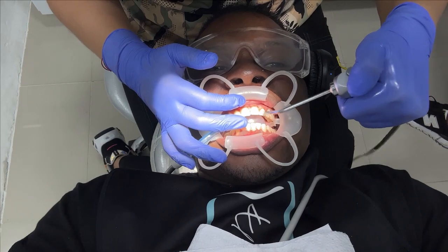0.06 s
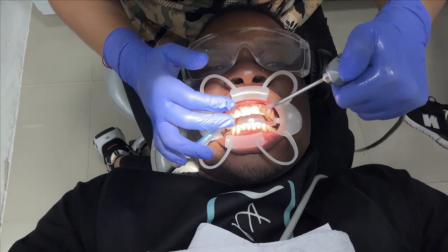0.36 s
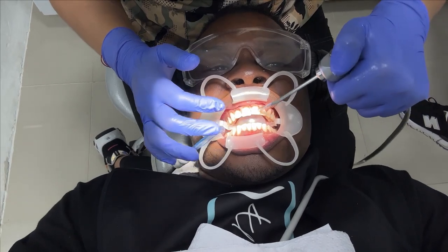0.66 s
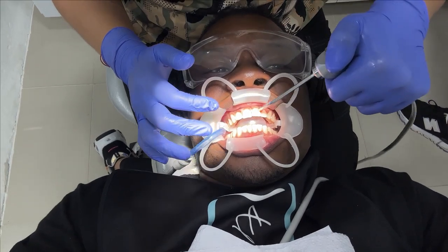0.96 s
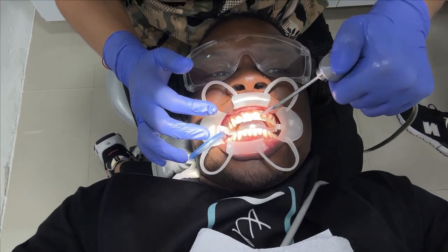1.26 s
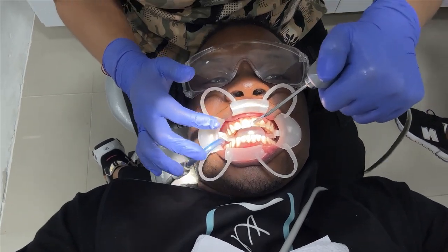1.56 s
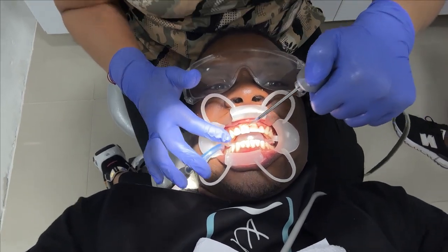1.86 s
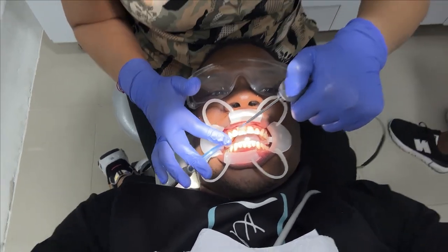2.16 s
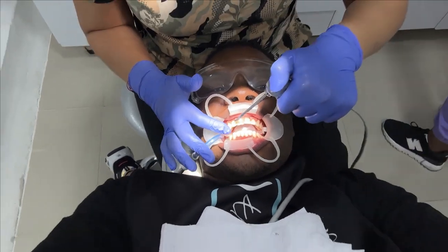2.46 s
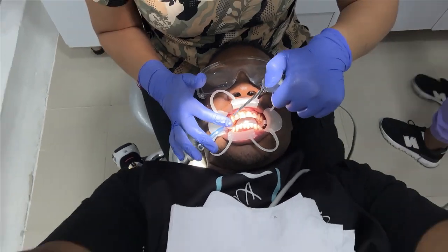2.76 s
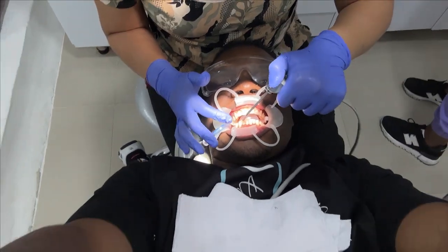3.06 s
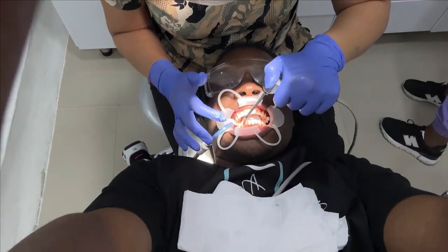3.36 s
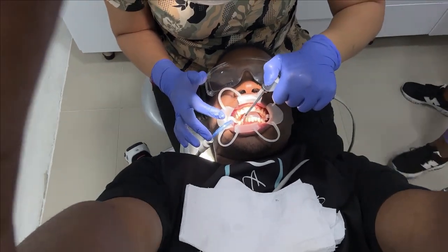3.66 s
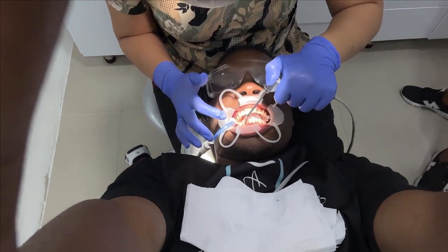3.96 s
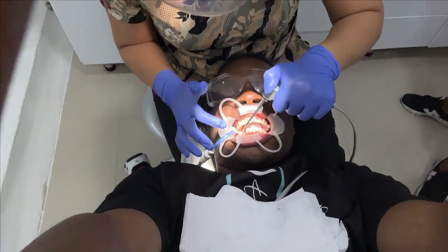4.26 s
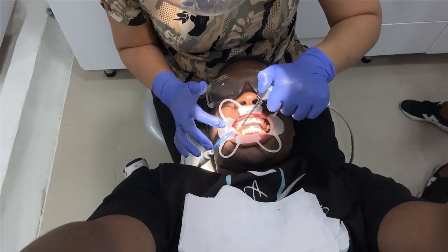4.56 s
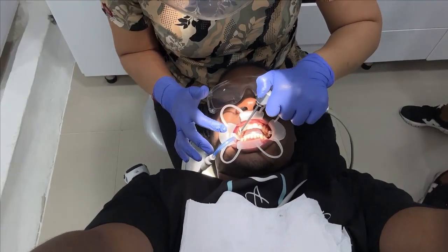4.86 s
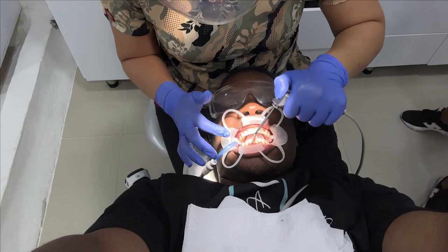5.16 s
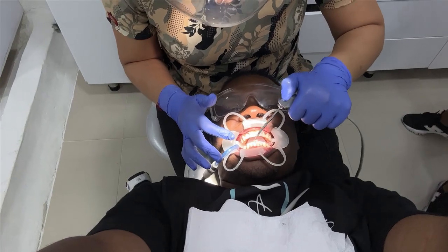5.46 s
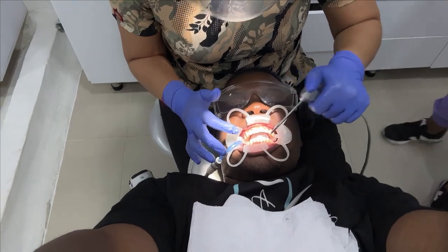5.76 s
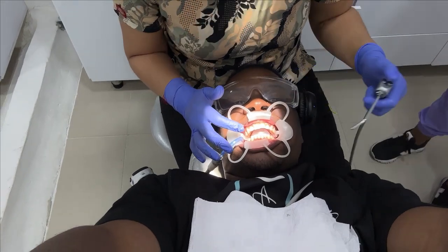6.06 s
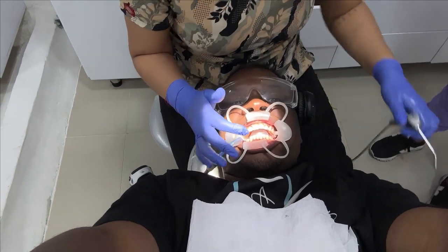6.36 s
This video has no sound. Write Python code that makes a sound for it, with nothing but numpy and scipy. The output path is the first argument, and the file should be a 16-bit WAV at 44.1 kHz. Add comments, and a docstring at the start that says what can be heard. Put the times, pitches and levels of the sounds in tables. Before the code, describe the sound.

A close jet of air and water sweeps over teeth, hissing and splashing in uneven surges while the open mouth gurgles and the tooth edges squeal and spit. The hand-held microphone bumps and rumbles softly partway through. After about five and a half seconds the jet stops, and a suction tube crackles with saliva among small wet pops and a last short sip, over the low ventilation of a dental room.

```python
"""Over the ventilation of a small clinic and a faint suction tube, an air and water nozzle sweeps teeth.
The jet hisses and splashes, rouses the hollow of the mouth, and squeals and spits on tooth edges.
From about 1.5 s come a brief low hum, then the bumps and rumble of a hand-held microphone being lifted.
At 5.6 s the valve shuts; drops pop in the mouth, saliva crackles up the tube and it ends on a sip."""
import sys
import numpy as np
from scipy import signal
from scipy.fft import rfft, irfft, next_fast_len
from scipy.io import wavfile

SR = 44100
rng = np.random.default_rng(int(sys.argv[2]) if len(sys.argv) > 2 else 0)


def materialize(psi):
    """Save the field psi as 16-bit PCM at rate SR to the path in sys.argv[1].

    A 1-D psi becomes a single channel; in a 2-D psi each row is a channel.
    """
    bounded = np.clip(np.atleast_2d(psi).T, -1, 1)
    quanta = np.round(bounded * 32767).astype(np.int16)
    wavfile.write(sys.argv[1], SR, quanta)


N = 283326
TIME = np.arange(N) / SR
SIZE = next_fast_len(N + SR // 2)
FREQS = np.maximum(np.arange(SIZE // 2 + 1) * SR / SIZE, 1)

# resonances where the jet points: t/s, lower mouth/Hz, upper mouth/Hz, tooth face/Hz,
# tooth face over splash/dB, tooth gap over splash/dB
JET_AIM = [(0, 1350, 2050, 6900, 1, -10), (.55, 1380, 2030, 6500, -17, -22),
           (1.1, 1200, 1900, 6740, -21, -6.5), (2.05, 1163, 1820, 6400, -14, -4.5),
           (2.7, 1320, 1860, 6630, -2, -3.5), (3.7, 1224, 1910, 6800, -7.5, 0.5),
           (4.6, 1254, 1860, 7000, -3.5, 3.5), (5.15, 1175, 1810, 6900, 6.5, 6),
           (5.6, 1230, 1900, 6570, 4.5, 5)]
# bed of spray between passes: t/s, jet/dB, splash/dB, wash/dB, edge/dB, lower mouth/dB, upper mouth/dB
SPRAY_BED = [(0, -32, -29.5, -42.5, -29.5, -38, -44.5), (.75, -35.5, -30.5, -44, -30.5, -49, -49.5),
             (1.35, -31.5, -29, -45, -33.5, -50.5, -49), (1.9, -37, -29, -38.5, -29, -47, -41.5),
             (2.5, -37.5, -28.5, -37.5, -31.5, -45.5, -37.5), (2.9, -34, -43, -36, -31, -59, -40),
             (3.25, -30, -31.5, -36, -34.5, -47, -45), (4.0, -33, -34.5, -39, -39, -51, -46.5),
             (4.7, -32, -34, -32, -33, -48.5, -42), (5.1, -32.5, -33, -34, -31.5, -51, -47.5),
             (5.27, -37, -34, -40, -35.5, -53, -44.5), (5.6, -40, -34.5, -41, -37, -51, -48)]
# surges as the jet crosses gaps between teeth:
# t/s, length/s, jet/dB, splash/dB, wash/dB, lower mouth/dB, upper mouth/dB
GAP_PASSES = [(.005, 0.044, -36, -32, -34, -26, -37), (0.291, 0.081, -29.5, -23, -36.5, -30.5, -35.5),
              (0.575, 0.1, -43, -22, -34.5, -31, -36), (0.826, 0.065, -40, -27.5, -56, -36.5, -44),
              (1.175, 0.14, -35, -26, -44, -48, -50), (1.485, 0.075, -31, -23, -34.5, -37.5, -34),
              (1.664, 0.052, -44, -26, -29, -38.5, -40), (1.744, 0.082, -30, -22.5, -33.5, -39, -33),
              (1.934, 0.071, -32, -46, -56, -35, -33), (2.003, 0.034, -25, -21.5, -57, -44, -40),
              (2.061, 0.078, -30, -18.5, -30.5, -40, -29), (2.183, 0.082, -28, -23.5, -37, -35.5, -29),
              (2.328, 0.1, -28.5, -18, -29.5, -40.5, -32.5), (2.66, 0.16, -61, -20.5, -23.5, -41, -28.5),
              (2.798, 0.097, -38, -35, -37, -45.5, -34.5), (2.886, 0.048, -40, -26, -23, -29.5, -28.5),
              (2.957, 0.24, -32, -24.5, -72, -40, -51), (3.42, 0.056, -34, -53, -34, -49, -41),
              (3.567, 0.1, -35, -29, -61, -53, -51), (3.703, 0.067, -34, -45, -36.5, -55, -41),
              (3.838, 0.11, -37, -30.5, -51, -54, -65), (4.08, 0.098, -28.5, -28.5, -39, -56, -60),
              (4.138, 0.12, -39, -29, -43, -38.5, -46), (4.349, 0.073, -26, -27.5, -35.5, -53, -58),
              (4.412, 0.09, -25, -25, -37, -36, -41), (4.627, 0.071, -31, -28.5, -25.5, -44, -38),
              (4.687, 0.091, -28, -31.5, -56, -42, -40), (4.927, 0.1, -51, -34, -23, -42, -45),
              (4.999, 0.072, -44, -28.5, -57, -40, -36), (5.495, 0.07, -27.5, -26, -41, -49, -48)]


def from_db(db):
    """Decibels to gain."""
    return np.exp(np.asarray(db, np.float32) * np.float32(np.log(10) / 20))


def rms_one(x):
    """Scale to unit power."""
    return x / np.sqrt(np.mean(x ** 2) + 1e-20)


def in_time(rows):
    """One automation curve per column after the time, joined by straight lines."""
    times, *columns = np.transpose(rows)
    return [np.interp(TIME, times, column) for column in columns]


def over_hz(points):
    """A curve drawn on a log-frequency axis."""
    hz, value = np.transpose(points)
    return np.interp(np.log(FREQS), np.log(hz), value)


def spectrum_of(x):
    """Zero-padded spectrum."""
    return rfft(x.astype(np.float32), SIZE)


def filtered(x, response):
    """Apply a frequency response."""
    return irfft(spectrum_of(x) * response.astype(np.float32), SIZE)[..., :N]


def coloured(x, spectrum):
    """EQ a sound to a curve, rolling off beyond its ends; unit power."""
    skirts = np.minimum(FREQS / spectrum[0][0], 1) ** 2 * np.minimum(spectrum[-1][0] / FREQS, 1) ** 2
    return rms_one(filtered(x, from_db(over_hz(spectrum)) * skirts))


def drift(rate):
    """Random modulation with spread 1, changing about rate times a second."""
    knots = rng.standard_normal(N // 8)
    return rms_one(np.interp(TIME * rate, np.arange(len(knots)), knots))


def turbulence(flutter_db, rate):
    """Noise that flutters as droplets come in clumps; two rows, direct and scattered sound."""
    return rng.standard_normal((2, N), np.float32) * from_db(flutter_db * drift(rate))


def resonator(hz, width_hz):
    """Coefficients of a resonance with gain 1 at its peak."""
    r = np.exp(-np.pi * width_hz / SR)
    return (1 - r * r) / 2 * np.array([1, 0, -1]), [1, -2 * r * np.cos(2 * np.pi * hz / SR), r * r]


def resonate(x, hz, width_hz):
    """Ring a sound through one steady resonance."""
    return signal.lfilter(*resonator(hz, width_hz), x + 1e-18)


def cavity(x, hz, width_hz, skirt_hz, size=512):
    """A moving resonance, with a second in series to steepen its skirts; unit power."""
    out, state = np.zeros((2, N), np.float32), np.zeros((2, 2, 2))
    for i in range(0, N, size):
        block = x[:, i:i + size]
        for k, width in enumerate((width_hz, skirt_hz)):
            block, state[k] = signal.lfilter(*resonator(hz[i], width), block, zi=state[k])
        out[:, i:i + size] = block
    return rms_one(out)


def around(t, length):
    """The samples within reach of a swell."""
    return slice(max(int((t - 2 * length) * SR), 0), int((t + 2 * length) * SR))


def surge(age, length):
    """Power of a swell, 1 at its middle and a half at the ends of its length."""
    steepness = np.where(age < 0, 3.26, 2.2)   # the attack is steeper than the release
    return np.exp(-np.log(2) * np.abs(2 * age / length) ** steepness)


def sweep(layer, length_share=1):
    """Gain of one layer of the spray: its bed plus a surge for every pass."""
    bed_column = ("jet", "splash", "wash", "edge", "lower", "upper").index(layer)
    pass_column = ("jet", "splash", "wash", "lower", "upper").index(layer)
    power = from_db(in_time(SPRAY_BED)[bed_column]) ** 2
    for t, length, *levels_db in GAP_PASSES:
        near = around(t, length)
        power[near] += from_db(levels_db[pass_column]) ** 2 * surge(TIME[near] - t, length_share * length)
    return np.sqrt(power)


def shower(per_s, low_hz, high_hz, cycles, scatter_db, pitches=18):
    """Tiny drops or bubbles at random moments, each ringing briefly at one of the pitches; unit power."""
    sizes = (rng.random(N) < per_s / SR) * from_db(scatter_db * np.clip(rng.standard_normal(N), -2, 1.5))
    clicks = sizes * rng.choice([-1, 1], (2, N))
    pitch_index = rng.integers(0, pitches, N)
    rings = sum(resonate(clicks * (pitch_index == k), hz, np.log(1000) / np.pi * hz / cycles)
                for k, hz in enumerate(np.geomspace(low_hz, high_hz, pitches)))
    return rms_one(resonate(rings, np.sqrt(low_hz * high_hz), high_hz - low_hz))


def bursts(rows):
    """Bell-shaped bursts of resonant noise."""
    out, lag = np.zeros((2, N)), np.arange(-SR // 4, SR // 4)
    for t, db, spread, hz, width in rows:
        bell = np.exp(-.5 * (lag / SR / spread) ** 2)
        burst = bell * resonate(resonate(rng.standard_normal((2, len(lag))), hz, width), hz, width)
        burst *= np.sqrt(np.mean(bell ** 2) / np.mean(burst ** 2))
        out[:, round(t * SR) + lag] += from_db(db) * burst
    return out


def room_tone():
    """Ventilation and distant machines, with the low tremor of the hand on the microphone."""
    rumble = [(0, -44, -49), (1.4, -44, -52), (1.9, -38.5, -42), (2.5, -44, -51.5), (3.3, -45.5, -48),
              (5.0, -45, -69), (6.42, -45, -90)]   # low bed: t/s, ventilation/dB, tremor/dB
    colour = [(20, -18), (40, -3), (63, 1.5), (85, -3), (118, 3), (230, 0.5), (350, -3), (550, -4.5),
              (800, -9), (1250, -8), (2000, -10), (3000, -22.5), (6000, -62), (11000, -46)]   # tone of the room: f/Hz, level/dB
    likeness = [(50, 0.51), (150, 0.94), (400, 0.55), (750, 0.29), (1200, 0.13), (2000, 0.033),
                (8000, 0.33)]   # stereo image of the room: f/Hz, left-right likeness/0-1
    level_db, tremor_db = in_time(rumble)
    alike = np.clip(over_hz(likeness), 0, 1)
    sign = np.array([[1], [-1]])
    air = coloured(rng.standard_normal((2, N), np.float32), colour)
    mid, side = filtered(air, np.sqrt((1 + sign * alike) / 2))
    shake = turbulence(flutter_db=2.5, rate=7.2)
    tremor = rms_one(resonate(resonate(shake, hz=54, width_hz=70), hz=54, width_hz=70))
    return from_db(level_db - 0.5) * (mid + sign * side) + from_db(tremor_db) * tremor


def air_jet():
    """Air rushes from the nozzle in a bright hiss."""
    colour = [(9000, -22), (11000, 12), (12200, 9.5), (13500, 14), (14600, 14.5), (15600, 14)]   # tone of the jet: f/Hz, level/dB
    return sweep("jet") * from_db(-1.0) * coloured(turbulence(flutter_db=1.5, rate=540), colour)


def gum_wash():
    """Water washes over the gums and rings the pocket between cheek and gum."""
    pocket = [(0, 4150), (1.2, 3760), (1.55, 2360), (2.0, 3100), (2.5, 3200), (2.95, 3270), (3.2, 2530),
              (4.2, 2700), (4.6, 3220), (5.6, 3400)]   # pitch of the pocket: t/s, f/Hz
    colour = [(900, -45), (1600, -8.5), (2200, 2), (2500, 5.5), (2800, -6.5), (3350, 6.5), (3800, 4),
              (4600, 4.5), (5300, 2.5), (7500, -8)]   # tone of the wash: f/Hz, level/dB
    drive = turbulence(flutter_db=1.5, rate=120)
    cheek = from_db(-5.5) * cavity(drive, in_time(pocket)[0] + 120 * drift(8.2), 480, skirt_hz=1200)
    wash = coloured(turbulence(flutter_db=0.0, rate=510), colour)
    return sweep("wash") * from_db(-5.5) * (wash + cheek)


def tooth_splash():
    """Droplets splash on the teeth, whose faces and gaps hiss at pitches of their own."""
    colour = [(3300, -24), (4300, -8.5), (5000, 4.5), (5600, 9.5), (6100, 6), (6600, 7.5), (7050, 5),
              (7500, 7), (8800, -13), (10000, 3.5), (13000, -37)]   # tone of the splash: f/Hz, level/dB
    _, _, face_hz, face_db, gap_db = in_time(JET_AIM)
    splash = from_db(-1.0) * coloured(turbulence(flutter_db=1.0, rate=460), colour)
    face = cavity(turbulence(flutter_db=-1.5, rate=310), face_hz + 90 * drift(4.41), 560, skirt_hz=1690)
    gap = cavity(turbulence(flutter_db=1.2, rate=240), 8250 + 90 * drift(9.0), 780, skirt_hz=1710)
    return sweep("splash") * from_db(-5.5) * (splash + from_db(face_db) * face + from_db(gap_db) * gap)


def edge_hiss():
    """Tooth edges hiss in the jet, higher and a touch louder while it is in a gap."""
    pitch = [(0, 9620), (1.4, 9160), (2.4, 10300), (3.3, 9400), (5.6, 10700)]   # centre of the hiss: t/s, f/Hz
    in_gap = np.zeros(N)
    for t, length, *_ in GAP_PASSES:
        near = around(t, length)
        in_gap[near] += surge(TIME[near] - t, length)
    in_gap = np.minimum(in_gap, 1)
    _, _, _, edge_db, _, _ = in_time(SPRAY_BED)
    drive = turbulence(flutter_db=0.5, rate=290)
    centre_hz = in_time(pitch)[0] + 320 * in_gap + 130 * drift(10)
    return from_db(edge_db + 0.7 * in_gap - 3.0) * cavity(drive, centre_hz, width_hz=3400, skirt_hz=1900)


def spray(splutter_db=1.0, feed_db=0.29):
    """Four hisses splutter apart over a patter of droplets; the uneven water feed shakes them all."""
    jet, wash, teeth, edge = air_jet(), gum_wash(), tooth_splash(), edge_hiss()
    hiss = sum(part * from_db(splutter_db * drift(75)) for part in (jet, wash, edge, teeth))
    droplets = shower(per_s=900, low_hz=3450, high_hz=6200, cycles=8.1, scatter_db=3.5)
    patter = sweep("splash") * from_db(-17.5) * droplets
    return (hiss + patter) * from_db(feed_db * drift(90))


def mouth():
    """Water churning in the cheek rouses two shifting mouth resonances; bubbles gurgle around them."""
    lower_hz, upper_hz, *_ = in_time(JET_AIM)
    churn = from_db(1.6 * drift(170))
    drive = turbulence(flutter_db=1.0, rate=550)
    lower = from_db(-1.0) * cavity(drive, lower_hz + 40 * drift(40) + 30 * drift(9), 126, skirt_hz=600)
    upper = cavity(drive, upper_hz + 40 * drift(60) + 22 * drift(9), 146, skirt_hz=556)
    lower_gain, upper_gain = sweep("lower", length_share=0.64), sweep("upper", length_share=0.64)
    bubbles = shower(per_s=260, low_hz=1090, high_hz=2140, cycles=14, scatter_db=2.4)
    gurgle = from_db(-9.5) * np.sqrt(lower_gain * upper_gain) * bubbles
    return churn * (lower_gain * lower + upper_gain * upper) + gurgle


def suction(fine_per_s, fine_db, snap_trim_db, draught_db):
    """Slugs of saliva snap up the tube and ring it, over a constant fine crackle and a thin draught."""
    slugs = [(5.714, -29), (5.7893, -33), (5.8256, -44), (5.855, -42), (5.87, -30.5), (5.9264, -33),
             (5.948, -39), (5.9663, -35), (5.995, -35), (6.0192, -38), (6.073, -29.5), (6.098, -30),
             (6.1518, -39), (6.1753, -44), (6.1898, -43), (6.227, -41), (6.244, -39), (6.275, -40),
             (6.3494, -46), (6.3893, -47), (6.414, -44)]   # the clearest snaps: t/s, level/dB
    tube_modes = [(3360, 690, 0), (4860, 340, 5), (6000, 430, 5), (7500, 1200, 0), (9100, 1100, -7),
                  (11000, 680, -6)]   # resonances of the tube: f/Hz, width/Hz, level/dB
    snaps = (rng.random(N) < fine_per_s / SR) * from_db(fine_db + 1.7 * rng.standard_normal(N))
    for t, db in slugs:
        snaps[round((t + .0015) * SR)] = from_db(db + snap_trim_db)
    # a slug gathers and parts within a few milliseconds
    snap_shape = np.exp(-np.abs(np.arange(-SR // 50, SR // 50)) / (0.0013 * SR))
    crackle = signal.fftconvolve(snaps, snap_shape, "same")
    air = (crackle + from_db(draught_db)) * rng.standard_normal((2, N))
    return sum((-1) ** k * from_db(db) * resonate(air, hz, width)
               for k, (hz, width, db) in enumerate(tube_modes))


def froth():
    """Tiny bubbles tick faintly throughout."""
    return from_db(-57.5) * shower(per_s=170, low_hz=920, high_hz=2840, cycles=13, scatter_db=5.6)


def squeals(sag_hz_per_s=1500):
    """A grazed tooth edge swells into a narrow hiss that sags in pitch as the edge leaves the jet."""
    grazes = [(.155, 0.057, -28.5, 10200), (.425, 0.061, -27.5, 10200), (.657, 0.05, -25, 9660),
              (.712, 0.035, -28.5, 9850), (.95, 0.09, -24.5, 9750), (1.005, 0.081, -25, 9340),
              (1.31, 0.2, -32, 9650), (1.61, 0.063, -39, 9600), (1.88, 0.25, -37, 10060),
              (2.11, 0.036, -24.5, 10400), (2.195, 0.045, -27, 10850), (2.5, .1, -34, 10000),
              (2.6, 0.043, -33.5, 10700), (2.7, 0.067, -40, 11400), (2.81, 0.083, -34.5, 10100)]   # grazed edges: t/s, length/s, level/dB, f/Hz
    power = np.full(N, 1e-12)
    weighted_hz = power * grazes[0][-1]
    for t, length, db, hz in grazes:
        near = around(t, length)
        age = TIME[near] - t
        swell = from_db(db) ** 2 * surge(age, length)
        power[near] += swell
        weighted_hz[near] += swell * (hz - sag_hz_per_s * age)
    centre_hz = weighted_hz / power + 130 * drift(37.4)
    hiss = cavity(turbulence(flutter_db=1.5, rate=190), centre_hz, width_hz=1600, skirt_hz=2400)
    return np.sqrt(power) * from_db(0.5) * cavity(hiss, centre_hz, width_hz=3900, skirt_hz=3400)


def drops(low_cut_hz=950):
    """Each drop bursts with a tiny crack and rings briefly, too small to carry any low end."""
    pops = [(0.236, -16, 1340, 26), (0.696, -24, 1340, 28), (1.154, -19.5, 1280, 10),
            (5.254, -21.5, 1770, 31), (5.294, -19.5, 1360, 9.5), (5.6999, -22.5, 2950, 10),
            (5.7, -30, 1250, 16), (6.047, -29, 1300, 14), (6.053, -27, 950, 12), (6.057, -26, 1200, 13),
            (6.061, -35, 1550, 12), (6.212, -33, 1170, 11), (6.2464, -44, 3620, 8.9),
            (6.299, -22.5, 2000, 10), (6.2995, -26.5, 1060, 11), (6.337, -29, 1840, 9),
            (6.368, -35, 1930, 9.8), (6.372, -30, 1220, 8)]   # drops popping in the mouth: t/s, level/dB, f/Hz, ring/cycles
    out, age = np.zeros((2, N + SR)), np.arange(SR // 20) / SR
    for t, db, hz, cycles in pops:
        ring = np.sin(2 * np.pi * hz * age) * from_db(-60 * age * hz / cycles) * [[1], [.4]]
        noise = 1.1 * rng.standard_normal((2, len(age))) * from_db(-60 * age / 0.0032)
        crack = 3.7 * resonate(resonate(noise, hz, 0.35 * hz), hz, 0.52 * hz)
        start = round(t * SR)
        out[:, start:start + len(age)] += from_db(db) * (ring + crack)
    return signal.sosfilt(signal.butter(2, low_cut_hz, "high", fs=SR, output="sos"), out[:, :N])


def gulps(bubbles_per_s=320, ring_cycles=11, pitch_scatter=0.082, pitch_rise=0.18):
    """Water pooled in the cheek breaks into quick clusters of bubbles, each rising in pitch as it dies."""
    clusters = [(0.264, .016, -30, 1400), (0.304, 0.033, -31, 1510), (0.583, .04, -35, 1450),
                (0.828, .035, -38.5, 1400), (2.885, .04, -36.5, 1330), (4.12, .07, -37.5, 1450),
                (4.426, 0.032, -40, 1270), (5.01, .02, -34.5, 1160), (5.473, 0.028, -33.5, 1300)]   # bubble clusters: t/s, length/s, level/dB, f/Hz
    out, age = np.zeros(N + SR), np.arange(SR // 25) / SR
    for t, length, db, hz in clusters:
        cluster = np.zeros(N + SR)
        count = max(int(bubbles_per_s * length), 1)
        for when, pitch, size in rng.standard_normal((40, 3))[:count]:
            cycles = age * hz * np.exp(pitch_scatter * pitch)
            life = cycles / ring_cycles
            chirp = np.sin(2 * np.pi * cycles * (1 + pitch_rise * life / 2))
            start = round((t + length * np.clip(when, -2, 2) / np.e) * SR)
            cluster[start:start + len(age)] += from_db(2 * size - 60 * life) * chirp
        out += from_db(db) * cluster * np.sqrt(length * SR / np.sum(cluster ** 2))
    return resonate(out[:N], hz=1630, width_hz=1100) * np.array([[1], [.4]])


def spits():
    """Water flicks off tooth edges in short, bright ticks."""
    flicks = [(.523, -21.5, 0.0034, 9600, 800), (.855, -26, 0.0066, 9400, 1590),
              (.863, -13.5, 0.00095, 9600, 1300), (.937, -16, 0.004, 9900, 1300),
              (2.015, -17, 0.0023, 9100, 3970), (2.175, -19, 0.0059, 10200, 3500),
              (2.195, -18, 0.0038, 10900, 3000), (2.903, -23.5, 0.0052, 12700, 4000),
              (2.905, -22, 0.0088, 6140, 2000), (3.425, -31, 0.02, 13700, 3500),
              (5.0, -25.5, 0.017, 10600, 4500), (5.148, -24, 0.0034, 10000, 3500),
              (5.155, -19, 0.005, 7600, 1600)]   # spits of water: t/s, level/dB, spread/s, f/Hz, width/Hz
    return bursts(flicks)


def handling_bumps():
    """The hand knocks dully on the microphone."""
    knocks = [(1.462, -38.5, 0.012, 470, 360), (1.688, -35, 0.009, 73.4, 31), (1.843, -38, 0.015, 380, 120),
              (1.848, -32.5, 0.0098, 208, 32), (1.876, -31.5, 0.0075, 79.5, 24),
              (1.882, -40, 0.013, 335, 98), (1.9, -36, 0.018, 160, 62), (1.94, -39, 0.028, 190, 81),
              (2.128, -35, 0.016, 61.6, 34), (2.28, -42.5, 0.023, 46, 11)]   # soft knocks: t/s, level/dB, spread/s, f/Hz, width/Hz
    return bursts(knocks)


def hum(middle_s=1.585, length_s=.13, hz=234):
    """A soft low tone swells and fades."""
    swell = np.sqrt(2 * surge(TIME - middle_s, length_s))
    return from_db(-43.5) * swell * np.sin(2 * np.pi * hz * TIME)


def valve(shut_s=5.58, shut_db_per_s=332, leak_db=-14.5, leak_db_per_s=78):
    """Gain as the valve closes: a fast cut, then the air left in the nozzle leaks away."""
    closed_s = np.maximum(TIME - shut_s, 0)
    return np.maximum(from_db(-shut_db_per_s * closed_s), from_db(leak_db - leak_db_per_s * closed_s))


def sip():
    """After the last big drop the tube sips briefly at the back of the mouth."""
    envelope = np.interp(TIME, [6.3, 6.33, 6.42], [0, 1, .8])
    slurp = rms_one(resonate(turbulence(flutter_db=4.5, rate=87), hz=1840, width_hz=230))
    return from_db(-49.0) * envelope * slurp


def reflections(early_db=-15, early_t60_s=0.02, tail_db=-17, tail_t60_s=0.066):
    """Frequency response of the direct path, quick echoes off face, bib and arms, and the room's tail."""
    age = np.arange(SR // 2) / SR
    response = np.zeros((2, len(age)))
    response[:, 0] = 1
    for db, t60 in ((early_db, early_t60_s), (tail_db, tail_t60_s)):
        decay = from_db(np.maximum(-60 * age / t60, -200)) * (age > .002)
        echo = rng.standard_normal(response.shape) * decay
        response += from_db(db) * echo / np.linalg.norm(echo, axis=1, keepdims=True)
    return spectrum_of(response / np.linalg.norm(response, axis=1, keepdims=True))


def microphone(x, lift_s=(1.9, 3.56)):
    """Sound reaches two ports; echoes, phase and balance crossfade from near to far as they are lifted."""
    likeness = [(150, .8), (750, .4), (1250, .86), (2500, .72), (4500, .78), (5800, .6), (7200, .78),
                (9000, .68), (9900, 1), (12100, 1), (13200, .58), (14000, .7), (14800, 1)]   # stereo image: f/Hz, left-right likeness/0-1
    phase_near = [(300, -.2), (1400, .4), (2200, .7), (3000, 1.6), (4000, 2.9), (7200, 3.3), (8200, .8),
                  (9200, .7), (9900, 0), (12300, 0), (13200, -1.4), (14700, -np.pi)]   # phase close to the nozzle: f/Hz, left lead/rad
    phase_far = [(300, -.2), (1300, .3), (1800, -.5), (2500, .2), (3700, .1), (4300, 2.2), (6200, 1.4),
                 (7300, 2.7), (8900, 1.9), (9900, 0), (12400, 0), (13300, -1.5), (14900, -np.pi)]   # phase farther off: f/Hz, left lead/rad
    balance_near = [(3500, -0.5), (5100, 3), (6500, -6.5), (8000, 1.5), (10000, 0)]   # pan close to the nozzle: f/Hz, left over right/dB
    balance_far = [(3200, 0), (5800, -3), (7200, -2.5), (8400, -5.5), (9600, -0.5)]   # pan farther off: f/Hz, left over right/dB
    alike = np.clip(over_hz(likeness), 0, 1)
    sign = np.array([[1], [-1]], np.float32)
    arriving = spectrum_of(x) * np.sqrt((1 + sign * alike) / 2).astype(np.float32)
    heard = []
    for phase, balance in ((phase_near, balance_near), (phase_far, balance_far)):
        mid, side = arriving * reflections()
        pan = from_db(sign * over_hz(balance) / 2)
        pan = pan / np.sqrt(np.mean(pan ** 2, axis=0))
        turn = np.exp(1j * sign * over_hz(phase) / 2)
        heard.append(irfft((mid + sign * side) * pan * turn, SIZE)[:, :N])
    near, far = heard
    lifted = np.interp(TIME, lift_s, [0, 1])
    return (1 - lifted) * near + lifted * far


def scene():
    """The close sounds pass through the microphone's two ports and sit on the room tone."""
    water = valve() * (spray() + mouth() + gulps() + squeals()) + spits() + drops()
    tube = suction(fine_per_s=94, fine_db=-46.5, snap_trim_db=-4.5, draught_db=-55) + sip() + froth()
    return microphone(water + tube + handling_bumps() + hum()) + room_tone()


def record(dry):
    """A steep high cut takes off the very top."""
    cutoff_hz = 15700
    return filtered(dry, 1 / np.sqrt(1 + (FREQS / cutoff_hz) ** 240))


dry = scene()
out = record(dry)
materialize(out)
```